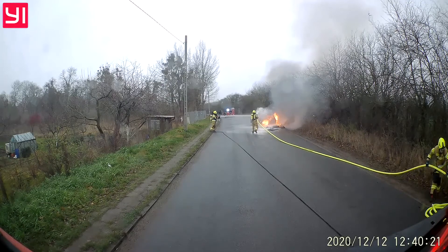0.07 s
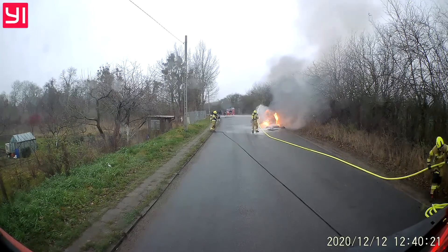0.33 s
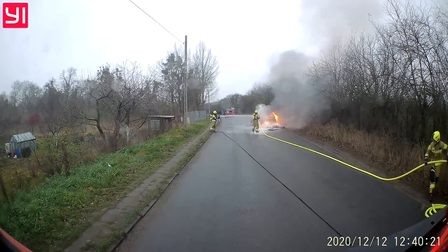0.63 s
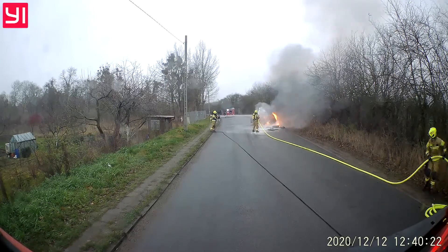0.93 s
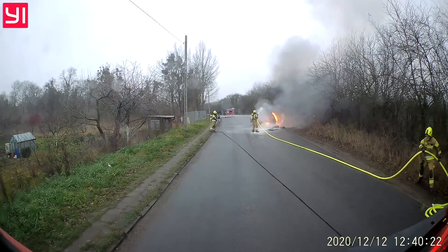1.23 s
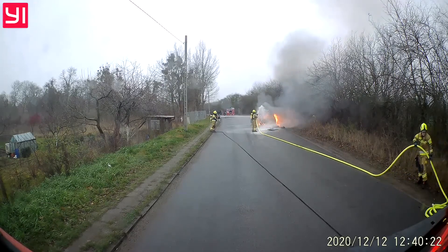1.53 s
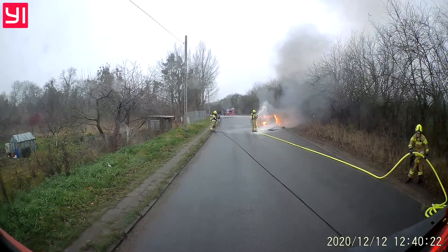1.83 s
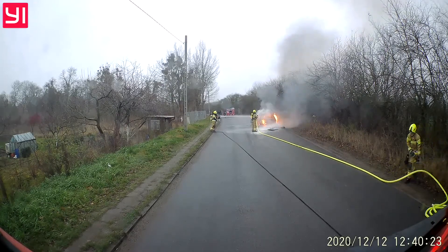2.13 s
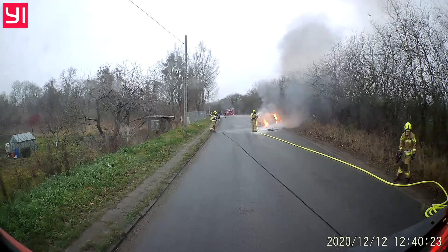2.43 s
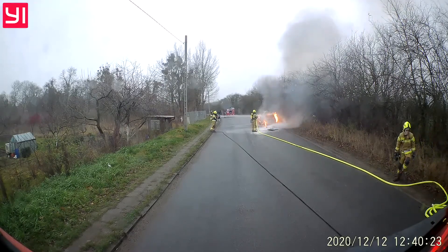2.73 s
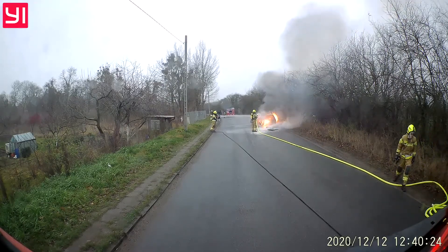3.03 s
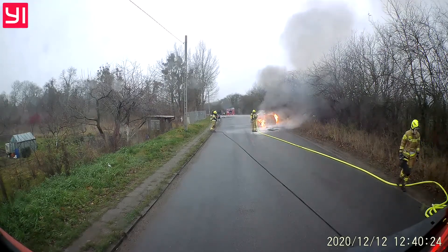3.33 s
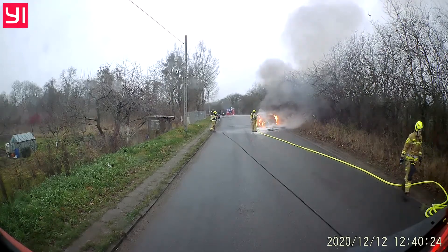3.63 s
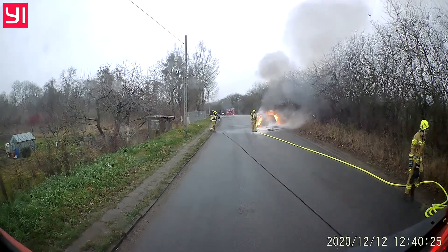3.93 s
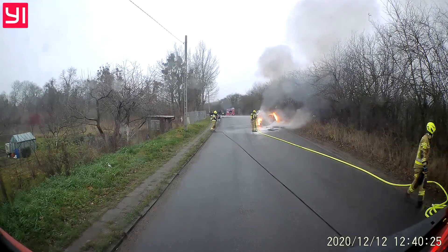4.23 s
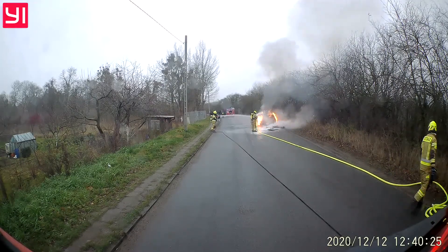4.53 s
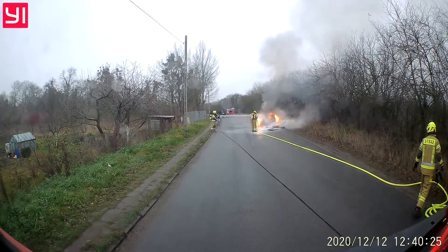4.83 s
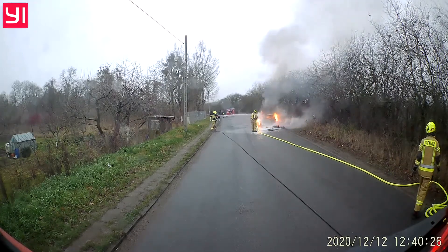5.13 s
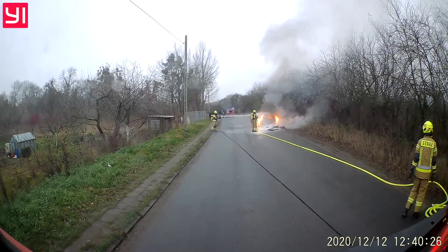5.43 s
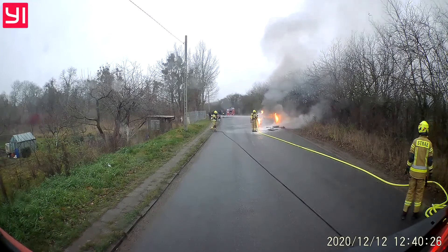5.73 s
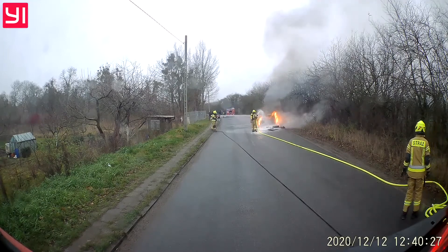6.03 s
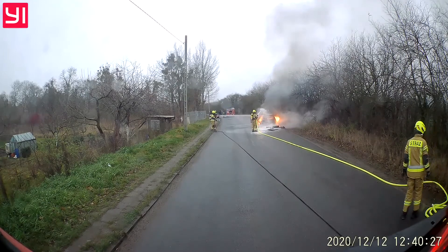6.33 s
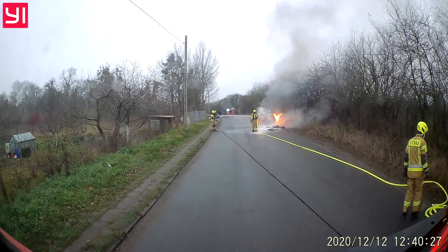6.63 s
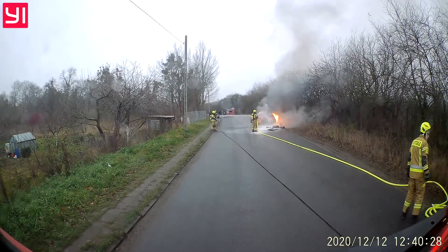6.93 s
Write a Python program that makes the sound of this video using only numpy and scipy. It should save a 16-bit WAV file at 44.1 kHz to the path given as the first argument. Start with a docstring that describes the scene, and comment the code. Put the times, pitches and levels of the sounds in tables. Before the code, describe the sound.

A deep, constant diesel hum fills a fire truck's cab, heard from just behind the windscreen. Right at the start something gives a thin, faint squeak, and a moment later there is one small plastic click. Throughout, the engine holds a fast idle, rumbling and lightly clattering, with the drone of its water pump beating slowly against it and a soft, even hiss underneath.

```python
"""Inside the cab of a parked fire engine: a six-cylinder diesel at fast, governed idle drives the pump.
The cab booms at the firing rate; the water pump, geared a little faster than the crank, beats slowly
against it. Combustion rumbles and clatters through the bulkhead over an even hiss.
Something in the cab squeaks faintly; a plastic part clicks once."""
import sys
import numpy as np
from scipy.fft import rfft, irfft, next_fast_len
from scipy.io import wavfile
from scipy.ndimage import map_coordinates

SR = 44100
rng = np.random.default_rng(int(sys.argv[2]) if len(sys.argv) > 2 else 0)


def unload_audio(sound):
    """Save the sound as a 16-bit wav file, at the path given as the first command line argument."""
    columns = np.transpose(np.atleast_2d(sound))
    # keep every value between -1 and 1, then stretch to whole-number steps
    steps = np.round(np.clip(columns, -1, 1) * 32767)
    wavfile.write(sys.argv[1], SR, steps.astype(np.int16))


N = 317079
CYLINDERS, CYCLE_HZ = 6, 11.2565  # four-stroke: two crank turns a cycle


def amp(db):
    """Decibels to gain."""
    return 10 ** (np.asarray(db) / 20)


def db_at(points, hz):
    """(Hz, dB) points on a log axis, silent outside them."""
    knots_hz, db = np.transpose(points)
    return np.interp(np.log(hz + 1e-9), np.log(knots_hz), db, left=-140, right=-140)


def wobble(knots_per_s):
    """Smooth random curve."""
    knots = rng.standard_normal(int(N * knots_per_s / SR) + 4)
    return map_coordinates(knots, [np.arange(N) * knots_per_s / SR])


def filtered(x, response):
    """x through a frequency response."""
    size = next_fast_len(N + SR // 2)
    return irfft(rfft(x, size) * response(np.fft.rfftfreq(size, 1 / SR)), size)[:N]


def noise(density, envelope):
    """Modulated noise of a given mean spectral density."""
    white = envelope * rng.standard_normal(N)
    white *= np.sqrt(SR / 2 / np.mean(white ** 2))  # unit power per Hz
    return filtered(white, lambda hz: amp(db_at(density, hz)))


def harmonics(turns, orders, rms_db, scatter_rad=np.pi):
    """Wave repeating each turn: an inward thump if the phases scatter little, a drone if much."""
    size = 2 ** 14
    phase = scatter_rad * rng.uniform(-1.04, 1, len(orders))
    bins = np.zeros(size // 2 + 1, complex)
    bins[np.rint(orders).astype(int)] = -amp(rms_db) * np.exp(1j * phase)
    one_turn = irfft(bins) * size / np.sqrt(2)
    return np.interp(turns % 1, np.arange(size) / size, one_turn, period=1)


# Trim panel resonances: (centre [Hz], width [Hz], lift [dB])
PANEL_MODES = [(1286, 78, 4), (1395, 94, 3.5), (1650, 54, 3), (1928, 230, 3), (2370, 85, 2.5),
               (2700, 130, 4), (3330, 35, 9), (3890, 58, 5), (4860, 190, 2.5), (6080, 120, 4)]

def panels(x):
    """Each ringing trim panel lifts a narrow band."""
    def lift_db(hz):
        return sum(db * np.exp(-(2 * (hz - centre) / width) ** 2) for centre, width, db in PANEL_MODES)
    return filtered(x, lambda hz: amp(lift_db(hz)))


# Hiss ahead of the panels: (frequency [Hz], density [dB/Hz])
HISS_DENSITY = [(1500, -98.5), (3200, -88), (3800, -84), (4200, -86.5), (4800, -83), (5500, -84),
                (6500, -83), (7200, -85), (7600, -89.5), (8000, -105)]

def hiss():
    """Even hiss with a slight flicker, coloured by the panels."""
    flicker_db = 0.55 * wobble(14)
    return panels(noise(HISS_DENSITY, amp(flicker_db)))


# Squeak contour: (time [s], pitch [Hz], rms level [dB])
SQUEAK_GLIDE = [(0.029, 1260, -66), (.08, 1240, -43), (.16, 1130, -44.5), (.23, 1100, -64),
                (.27, 1093, -120)]

def squeak():
    """One thin, slightly rough tone slides down."""
    knots_s, hz, db = np.transpose(SQUEAK_GLIDE)
    t = np.arange(N) / SR
    pitch_hz = np.interp(t, knots_s, hz) * (1 + .012 * wobble(140))
    return amp(np.interp(t, knots_s, db)) * np.sqrt(2) * np.sin(2 * np.pi * np.cumsum(pitch_hz) / SR)


# Modes of the clicking part: (centre [Hz], width [Hz], gain [dB])
PLASTIC_MODES = [(520, 90, 19), (830, 160, -1), (1430, 300, 1), (2650, 450, -2), (3500, 900, -5),
                 (5100, 800, -7), (6700, 900, -4)]

def plastic(hz):
    """Response of a plastic part: damped modes of alternating sign."""
    return sum((-1) ** k * amp(db) * 1j * hz * width / (centre ** 2 - hz ** 2 + 1j * hz * width)
               for k, (centre, width, db) in enumerate(PLASTIC_MODES))


# Lead-in tick and snap: (time [s], drive level [dB], t60 [s], low-pass [Hz])
CONTACTS = [(1.1065, -8, .014, 1600), (1.128, -7.5, .032, 6200)]

def click(attack_s=.0006):
    """Short scraping contacts excite the plastic part."""
    out = np.zeros(N)
    for start_s, db, t60_s, lowpass_hz in CONTACTS:
        age_s = np.maximum(np.arange(N) / SR - start_s, 0)
        envelope = (1 - np.exp(-age_s / attack_s)) * amp(db - 60 * age_s / t60_s)
        scrape = envelope * rng.standard_normal(N)
        out += filtered(scrape, lambda hz: plastic(hz) / (1 + 1j * hz / lowpass_hz))
    return out


def governor(hunt, flutter):
    """Running time of the machinery [s]: the speed strays by tiny fractions."""
    return np.cumsum(1 + hunt * wobble(2) + flutter * wobble(20)) / SR


# Accessory tones: (frequency [Hz], rms level [dB])
BELT_TONES = [(143.0, -35), (211.4, -42)]

def belt(clock_s):
    """Belt-driven accessories hum, following engine speed."""
    return sum(amp(db) * np.sqrt(2) * np.sin(2 * np.pi * (hz * clock_s + rng.random()))
               for hz, db in BELT_TONES)


# Pump lines: (shaft order [1], rms level [dB])
PUMP_ORDERS = [(1, -41), (2, -41), (3, -37), (11, -36), (12, -36), (13, -35), (14, -40), (18, -51)]

def pump(clock_s, shaft_hz=23.15):
    """The geared water pump drones at multiples of its shaft speed."""
    orders, db = np.transpose(PUMP_ORDERS)
    return harmonics(shaft_hz * clock_s, orders, db)


# Irregular part of the combustion, heard in the cab: (frequency [Hz], density [dB/Hz])
RUMBLE_DENSITY = [(12, -74.5), (40, -57.5), (66, -55), (95, -61.5), (125, -54.5), (155, -46), (190, -54),
                  (275, -51), (340, -56), (410, -62), (490, -53), (590, -58.5), (680, -66.5), (1100, -90.5)]
# Injectors and valve gear: (frequency [Hz], relative density [dB])
CLATTER_SHAPE = [(450, -86), (750, -59.5), (1000, -67.5), (1150, -73.5), (1400, -75), (1900, -73),
                 (2200, -76.5), (2700, -78.5), (3100, -81.5), (4200, -96.5), (7000, -105)]

def diesel_noise(cycles, swell_db=1.5):
    """Rumble and clatter swell at each firing; the clatter rings the panels."""
    swell = amp(swell_db * np.cos(np.pi * cycles * CYLINDERS) ** 2)
    rumble = noise(RUMBLE_DENSITY, swell)
    clatter = amp(-2) * noise(CLATTER_SHAPE, swell)
    return rumble + panels(clatter)


# Line envelopes ahead of the panels: (frequency [Hz], rms level per line [dB])
FIRING_LINES = [(67, -17), (135, -33), (203, -33), (270, -29.5), (405, -52.5), (540, -43), (640, -66),
                (743, -48), (950, -64), (1620, -64.5), (3260, -77)]  # multiples of the firing rate
HALFWAY_LINES = [(33, -61), (169, -35.5), (439, -51), (506, -37), (574, -33.5), (640, -58.5), (777, -50),
                 (850, -61), (1050, -56.5), (1300, -69)]  # between those: front and rear three cylinders differ
BUZZ_LINES = [(20, -64), (80, -49), (300, -48), (560, -54), (680, -62), (800, -65.5), (1050, -60),
              (1160, -74), (1300, -66), (1900, -69.5), (2200, -76), (2700, -70), (3100, -80.5), (4000, -87)]  # all weaker lines
# Narrow peaks of the once-a-cycle engine throb, plus two faint whines:
# (centre [Hz], width [Hz], rms level of a line at centre [dB])
THROB_PEAKS = [(113, 7.8, -38.5), (161, 10, -42), (228.2, 6.8, -35.5), (252.6, 18, -37.5),
               (277, 9.2, -35.5), (425.5, 14, -42), (484, 18, -43.5), (554.7, 29, -44), (597, 9.2, -45.5),
               (968, 8, -52), (1036, 10, -49)]
# Most low lines keep step with the throb, the rest scatter: (frequency [Hz], scatter [rad])
PHASE_SCATTER = [(70, .5), (160, 2.6), (245, .6), (285, .6), (400, 3.14)]

def diesel_boom(cycles, ripple_db=3):
    """Firing harmonics over a weak buzz; the hardest cylinder adds a throb once a cycle."""
    orders = np.arange(2, 356)
    hz = orders * CYCLE_HZ
    throb_db = np.max([db - 10 * np.log10(1 + (2 * (hz - centre) / width) ** 2)
                       for centre, width, db in THROB_PEAKS], axis=0)
    strong_db = np.select([orders % CYLINDERS == 0, orders % (CYLINDERS // 2) == 0],
                          [db_at(FIRING_LINES, hz), db_at(HALFWAY_LINES, hz)], throb_db)
    buzz_db = db_at(BUZZ_LINES, hz) + ripple_db * rng.uniform(-1.2, 1, len(hz))
    scatter_rad = np.interp(hz, *np.transpose(PHASE_SCATTER))
    return panels(harmonics(cycles, orders, np.maximum(strong_db, buzz_db), scatter_rad))


def scene():
    """All sources at one point behind the windscreen."""
    clock_s = governor(hunt=.0005, flutter=.001)
    cycles = CYCLE_HZ * (clock_s - .045)  # hardest cylinder first fires at 45 ms
    background = hiss() + squeak() + click()
    diesel = diesel_noise(cycles) + diesel_boom(cycles)
    return (background + belt(clock_s) + pump(clock_s) + diesel)[None]


def record(dry, top_hz=8150):
    """Brick-wall low-pass."""
    return filtered(dry[0], lambda hz: hz < top_hz)[None]


dry = scene()
out = record(dry)
unload_audio(out)
```